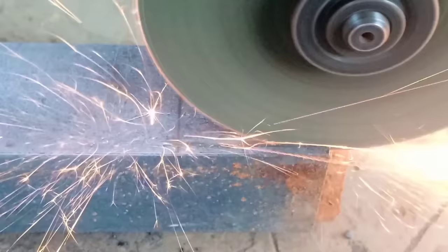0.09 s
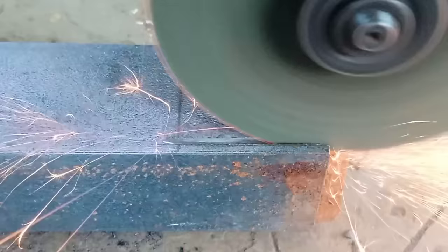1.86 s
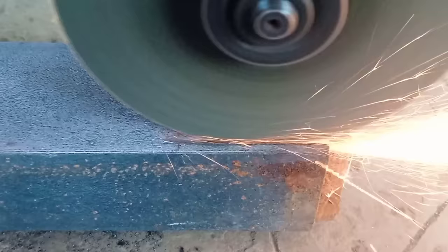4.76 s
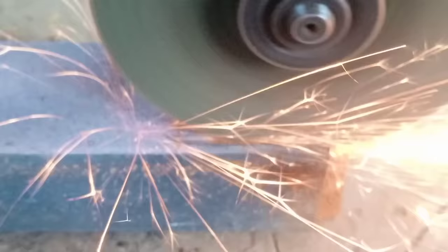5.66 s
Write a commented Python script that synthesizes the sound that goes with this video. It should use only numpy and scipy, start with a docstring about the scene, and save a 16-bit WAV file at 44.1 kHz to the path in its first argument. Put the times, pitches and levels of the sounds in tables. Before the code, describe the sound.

Very close, an angle grinder cuts a steel bar: harsh gritty rasp, fizzing bright hiss and wavering metallic whines. Air thrown by the disc thumps and flutters against the microphone. Before two seconds the disc lifts, speeds up and shows a smoother motor whirr, then bites again, drops in pitch and grinds on to the end. The sound is dry and centred, with no audible room.

```python
"""An angle grinder cuts a steel bar close to a mono microphone: grit noise and a rim pattern that repeats every turn.
Over it shaft orders whine as sines, and gusts thrown by the disc buffet the microphone as low noise and puffs.
At 1.8 s the disc lifts and speeds up: the rasp takes its free colour, motor hum and fan tones stand out.
Near 2.5 s it bites again, slows down, and cuts with fresh singing orders and gusts to the end."""
import sys
import numpy as np
from scipy import signal
from scipy.fft import rfft, irfft, next_fast_len
from scipy.io import wavfile
from scipy.ndimage import uniform_filter1d, map_coordinates

SR = 44100
rng = np.random.default_rng(int(sys.argv[2]) if len(sys.argv) > 2 else 0)


def waveform_to_disk(signal):
    """Save audio, clipped to [-1, 1], as 16-bit WAV at the path in sys.argv[1]."""
    frames = np.transpose(np.atleast_2d(signal))
    scaled = np.clip(frames, -1, 1) * 32767
    samples = np.round(scaled).astype(np.int16)
    wavfile.write(sys.argv[1], SR, samples)


def magnitude_from_level(level_db):
    """Linear magnitude for a level in decibels (20 dB per decade)."""
    exponent = np.asarray(level_db, float) / 20
    return 10 ** exponent


N = 280917

# disc speed: time_s, speed_turns_per_s
DISC_SPEED = [(0.0, 140.5), (0.2, 140), (0.3, 139.3), (0.5, 138.4), (0.62, 137.4), (0.8, 137.3),
              (0.95, 135.7), (1.1, 137.2), (1.25, 137.8), (1.4, 139.6), (1.6, 139.7), (1.78, 140.6),
              (1.84, 145.0), (2.0, 153.8), (2.2, 159.5), (2.4, 161.8), (2.52, 162.3), (2.61, 161.8),
              (2.7, 159.1), (2.9, 152.2), (3.0, 146.1), (3.1, 142.4), (3.3, 137.0), (3.45, 135.7),
              (3.75, 134.0), (4.1, 134.6), (4.42, 135.9), (4.7, 134.2), (5.0, 133.55), (5.4, 133.2),
              (5.65, 132.5), (5.88, 133.85), (6.1, 133.5), (6.37, 132.1)]
# firmness of the rim in the cut: time_s, contact_0_to_1
RIM_CONTACT = [(0, 0.77), (1.78, 0.84), (1.86, 0.33), (2.47, 0.08), (2.53, 0.57), (2.95, 0.77), (3.1, 0.86),
               (6.37, 0.82)]
# rasp level before fluctuations: time_s, level_db
RASP_LEVEL = [(0, -33.5), (0.8, -33.5), (1.0, -35.5), (1.5, -33.5), (1.79, -35), (1.84, -37.5), (1.88, -32),
              (1.92, -37), (1.95, -34), (2.15, -29.5), (2.36, -30), (2.39, -35.5), (2.45, -34),
              (2.49, -31.5), (2.65, -35), (3.7, -34.5), (4.36, -34.5), (5.75, -34.5), (6.37, -34)]
# rasp spectrum in the cut, relative: freq_hz, density_db_per_hz
CUT_SPECTRUM = [(210, -30), (350, -6.5), (600, -8.5), (1300, -5.5), (1800, -8), (2800, -8), (3850, -1),
                (4750, -13), (6200, -6), (8000, -10), (10500, -19), (12000, -20), (13800, -20), (14600, -4),
                (15800, -2.5)]
# rasp spectrum running free, relative: freq_hz, density_db_per_hz
FREE_SPECTRUM = [(410, -52), (700, -15.5), (1040, -12), (1170, -6), (1730, -16), (1920, -10), (2660, -13),
                 (3200, 2), (4300, -8), (7300, -9), (8000, -16), (10400, -46), (17600, -120)]
# resonances and notches of bar, guard and disc: center_hz, width_hz, gain_db
RESONANCES = [(1394, 270, 6.5), (2203, 950, 11), (2550, 320, 7), (3100, 530, 5), (5176, 220, 10.5),
              (5550, 210, 8), (6620, 450, 4.5), (7017, 390, 13.5), (7670, 430, 11.5), (8530, 170, 8),
              (9700, 430, 4), (12700, 500, 5), (14900, 520, 5), (2890, 160, -6.5), (3840, 165, -24),
              (6040, 200, -2)]
# shaft orders that sing out, before flutter: start_s, order_per_turn, length_s, peak_db
SINGING_ORDERS = [(-0.05, 17, 0.85, -34), (-0.05, 37, 0.99, -35.5), (1.04, 37, 0.7, -42),
                  (-0.05, 50, 0.26, -35), (0.01, 23, 0.39, -33.5), (0.023, 18, 0.3, -34),
                  (0, 14, 0.42, -42), (-0.05, 16, 0.87, -31.5), (0.616, 19, 0.12, -32.5),
                  (0.502, 24, 1, -39.5), (0.867, 48, 0.16, -30), (0.94, 52, 0.13, -30),
                  (1.01, 16, 0.2, -34.5), (1.1, 10, 0.3, -47), (1.108, 50, 0.22, -30.5),
                  (1.327, 50, 0.3, -25), (1.32, 52, 0.22, -30), (1.334, 19, 0.23, -35.5),
                  (1.33, 49, 0.21, -28.5), (1.48, 51, 0.19, -33), (1.688, 17, 0.12, -30.5),
                  (1.734, 50, 0.08, -29), (2.51, 15, 0.071, -29.5), (2.52, 16, 0.2, -39),
                  (2.642, 15, 0.14, -31.5), (2.802, 15, 0.1, -33), (2.8, 17, 0.23, -34.5),
                  (2.95, 19, 0.7, -43), (2.818, 36, 0.2, -35), (2.83, 37, 0.73, -35.5),
                  (2.93, 48, 0.27, -30.5), (3.03, 16, 1, -39.5), (3.072, 49, 0.12, -35),
                  (3.07, 50, 0.49, -37), (3.08, 18, 0.21, -33), (3.09, 46, 0.18, -33),
                  (3.346, 17, 0.28, -35), (3.34, 52, 0.6, -39.5), (3.467, 39, 0.24, -40),
                  (3.693, 18, 0.12, -32), (3.72, 53, 0.53, -37), (3.73, 49, 0.45, -36),
                  (3.72, 44, 0.22, -41), (4.05, 44, 0.29, -36), (3.7, 54, 0.5, -36), (3.816, 24, 0.93, -38),
                  (4.0, 8, 0.42, -43), (4.02, 52, 0.12, -27.5), (4.14, 48, 0.19, -35),
                  (4.21, 16, 0.64, -32.5), (4.1, 37, 0.44, -39), (4.386, 52, 0.24, -29.5),
                  (4.458, 53, 0.39, -30.5), (4.36, 19, 0.27, -37), (4.722, 18, 0.78, -37.5),
                  (4.744, 19, 0.2, -33), (4.82, 17, 0.26, -38.5), (4.8, 52, 0.2, -35),
                  (4.98, 39, 0.39, -37), (5.01, 24, 0.18, -34.5), (5.183, 16, 0.33, -35.5),
                  (5.19, 52, 0.59, -35.5), (5.15, 19, 0.22, -41), (5.47, 20, 0.17, -37),
                  (5.5, 19, 0.68, -41.5), (5.6, 16, 0.49, -38.5), (5.51, 49, 0.46, -40),
                  (5.56, 15, 0.17, -36), (5.59, 53, 0.15, -26.5), (5.595, 12, 0.62, -47),
                  (5.6, 51, 0.57, -40), (5.75, 8, 0.67, -49), (5.85, 7, 0.52, -48), (5.85, 52, 0.43, -38)]
# orders that come and go faintly in the cut: order_per_turn, usual_peak_db
FAINT_ORDERS = [(8, -55), (10, -53), (16, -45.5), (17, -45), (18, -45.5), (19, -48), (20, -47.5), (23, -45),
                (37, -48), (49, -43.5), (50, -42), (51, -41), (52, -41), (53, -41), (54, -43), (55, -44),
                (57, -42), (58, -45.5)]
# gusts on the microphone: start_s, length_s, buffet_db, puff_db
GUSTS = [(0.207, 0.27, -37.5, -47), (0.496, 0.13, -35.5, -41.5), (0.775, 0.11, -33, -34),
         (0.893, 0.057, -30.5, -30), (0.965, 0.14, -32, -38.5), (1.12, 0.11, -32, -37),
         (1.342, 0.039, -36, -41), (1.397, 0.14, -37, -36.5), (1.523, 0.15, -34, -34.5),
         (1.679, 0.12, -34, -38), (1.956, 0.22, -35.5, -50), (2.177, 0.26, -30.5, -49),
         (2.468, 0.094, -31.5, -50), (2.565, 0.11, -30, -32.5), (2.702, 0.22, -36, -38),
         (2.932, 0.14, -37, -31.5), (3.093, 0.16, -37.5, -37), (3.372, 0.081, -31.5, -38),
         (3.693, 0.17, -30.5, -38), (3.87, 0.073, -35.5, -41.5), (3.97, 0.273, -37, -41.5),
         (4.285, 0.091, -42, -45), (4.439, 0.2, -32, -47), (4.681, 0.12, -38, -40.5),
         (4.851, 0.048, -31, -42), (4.927, 0.08, -36, -42), (5.049, 0.03, -29.5, -34.5),
         (5.175, 0.15, -36, -36), (5.395, 0.04, -38, -38.5), (5.452, 0.16, -34, -37),
         (5.595, 0.13, -35.5, -36.5), (5.753, 0.25, -42.5, -48.5)]
# low turbulence, relative: freq_hz, density_db_per_hz
BUFFET_SPECTRUM = [(15, -54), (25, -15.5), (97, 4.5), (177, 1.5), (213, -2), (274, -1), (365, -9.5),
                   (500, -9), (650, -47), (1100, -120)]
# small eddies, relative: freq_hz, density_db_per_hz
EDDY_SPECTRUM = [(60, -6), (200, -2.5), (450, 1), (900, -5), (1600, -8), (3000, -15), (6000, -56)]
# strongest puffs, below zero = suction: time_s, nominal_peak_full_scale
STRONG_PUFFS = [(0.8607, 0.17), (0.8692, -0.16), (0.908, -0.16), (0.925, 0.23), (0.9337, -0.13),
                (0.9956, 0.24), (1.038, -0.14), (1.156, -0.2), (1.2207, 0.17), (1.226, -0.2),
                (1.4348, -0.22), (1.4784, -0.17), (1.5358, 0.24), (1.5635, -0.14), (1.587, -0.14),
                (1.6156, 0.24), (1.6213, 0.29), (1.6357, -0.2), (1.643, -0.14), (2.4132, -0.16),
                (2.572, -0.16), (2.592, 0.24), (2.6123, -0.16), (2.6297, -0.21), (2.6456, -0.17),
                (2.656, 0.13), (2.7862, 0.21), (2.9491, 0.14), (2.9684, -0.29), (2.9885, -0.22),
                (2.993, -0.24), (3.1418, 0.29), (3.1847, -0.18), (3.1914, -0.16), (3.2427, -0.18),
                (3.7577, -0.19), (4.0629, 0.21), (4.212, -0.18), (4.3071, -0.18), (4.404, -0.14),
                (4.463, 0.14), (4.5518, -0.15), (4.932, -0.15), (5.283, 0.23), (5.2985, -0.23),
                (5.448, -0.18), (5.493, 0.26), (5.6459, 0.1), (5.6537, -0.16), (5.6624, -0.18)]

BAND_LIMIT_HZ = 15740
LOADED_TURNS_PER_S = 132.5


def unit(x):
    """Bring to rms 1."""
    return x / np.sqrt(np.mean(x ** 2) + 1e-20)


def along(points, hz):
    """Interpolate (freq_hz, value) points on a log frequency axis."""
    point_hz, value = np.transpose(points)
    return np.interp(np.log(hz + 1), np.log(point_hz + 1), value)


def curves(rows):
    """One value per sample for each column after the time."""
    time_s, *columns = np.transpose(rows)
    return [np.interp(np.arange(N) / SR, time_s, column) for column in columns]


def wobble(rate_hz):
    """A smooth random curve, rate_hz knots a second."""
    step = 32
    coarse = np.arange(0, N + step, step)
    knots = rng.standard_normal(int(N * rate_hz / SR) + 5)
    smooth = map_coordinates(knots, [coarse * rate_hz / SR])
    return np.interp(np.arange(N), coarse, smooth)


def filtered(x, response):
    """x times a response of frequency."""
    size = next_fast_len(N + 8192)
    hz = np.fft.rfftfreq(size, 1 / SR)
    return irfft(rfft(x, size) * response(hz), size)[..., :N]


def rasp(turns, contact):
    """Rim pattern plus grit noise, both pulsing with the turn, coloured by steel and disc."""
    disc_cut_db, disc_free_db = 1, -1  # disc ring over bar ring
    hiss_level_db, hiss_free_db, hiss_flicker_db = -32, -1.5, 0.57  # spark hiss
    hiss_follow = 0.35  # share of the rasp's swings

    bar_db = curves(RASP_LEVEL)[0] + 0.19 * wobble(4.71)
    chatter_db = 0.8 * wobble(34)  # shared by the whole rasp
    disc_db = bar_db + disc_cut_db * contact + disc_free_db * (1 - contact) + 0.37 * wobble(14)
    hiss_db = hiss_level_db + hiss_free_db * (1 - contact)
    hiss_db = hiss_db + hiss_follow * (bar_db - bar_db.mean()) + hiss_flicker_db * wobble(10)

    rim = round_disc(turns, memory_turns=19.3, points_per_turn=320)
    runout_db = 1.25 * contact * round_disc(turns, memory_turns=1.7, points_per_turn=4)
    runout_db += 0.57 * contact * np.cos(2 * np.pi * turns) + 0.21 * wobble(23)
    rim_share = np.clip(0.5 * contact, 0, 1)
    grit = rng.standard_normal(N)
    rough = np.sqrt(rim_share) * rim + np.sqrt(1 - rim_share) * grit
    bite = patchy(magnitude_from_level(runout_db) * rough, depth_db=1.37)

    def above(hz, edge_hz):
        return 1 / (1 + (edge_hz / (hz + 1)) ** 16)

    def zones(hz):  # bar, disc, hiss
        low, high = above(hz, 4200), above(hz, 8200)
        return np.array([1 - low, low - high, high * (hz < BAND_LIMIT_HZ)])

    def cut_response(hz):
        ring_db = sum(db / (1 + (2 * (hz - center) / width) ** 2) for center, width, db in RESONANCES)
        return magnitude_from_level(along(CUT_SPECTRUM, hz)) * magnitude_from_level(ring_db) * zones(hz)

    def free_response(hz):
        return magnitude_from_level(along(FREE_SPECTRUM, hz)) * zones(hz)[:2]

    cut = [unit(part) for part in filtered(bite, cut_response)]
    free = [unit(part) for part in filtered(bite, free_response)]
    bar, disc = np.sqrt(contact) * cut[:2] + np.sqrt(1 - contact) * free
    return magnitude_from_level(chatter_db) * (magnitude_from_level(bar_db) * bar + magnitude_from_level(disc_db) * disc + magnitude_from_level(hiss_db) * cut[2])


def round_disc(turns, memory_turns, points_per_turn):
    """A random pattern around the rim that returns each turn and wears into a new one over some turns."""
    rows = rng.standard_normal((int(turns[-1]) + 2, points_per_turn))
    worn = signal.lfilter([1], [1, -np.exp(-1 / memory_turns)], rows, axis=0)
    return unit(map_coordinates(worn.ravel(), [turns * points_per_turn]))


def patchy(x, depth_db):
    """The colour shifts in random patches as the contact point wanders."""
    spectrum = signal.stft(x, nperseg=512)[2]
    field = uniform_filter1d(rng.standard_normal(spectrum.shape), size=5, axis=0)
    field = uniform_filter1d(field, size=12, axis=1)
    return signal.istft(spectrum * magnitude_from_level(depth_db * unit(field)), nperseg=512)[1][:N]


def whine(turns, speed, contact):
    """Each singing order swells, flutters and fades; neighbours stay nearly in step, so they beat once a turn."""
    swell_s, faint_swing_db = 0.074, 4
    faint_loss_db_per_hz = 0.5  # faint orders leave the resonances as the disc speeds up
    t = np.arange(N) / SR
    out = np.zeros(N)
    faint = {round(order): db for order, db in FAINT_ORDERS}
    drift_rad = 0.021 * wobble(6)  # the high spot of the rim creeps a little
    for order in sorted({round(row[1]) for row in SINGING_ORDERS} | set(faint)):
        faint_db = faint.get(order, -120) - faint_loss_db_per_hz * (speed - LOADED_TURNS_PER_S)
        swell = contact ** 2 * magnitude_from_level(faint_db + faint_swing_db * wobble(2.96))
        for start_s, row_order, length_s, peak_db in SINGING_ORDERS:
            if round(row_order) != order:
                continue
            edge_s = np.minimum(t - start_s, start_s + length_s - t)
            shape = np.clip(edge_s / swell_s + 0.5, 0, 1)
            swell = np.maximum(swell, magnitude_from_level(peak_db) * shape)
        phase = order * (2 * np.pi * turns + drift_rad) + 0.49 * wobble(20) + 0.5 * wobble(2.007)
        out += swell * magnitude_from_level(1.9 * wobble(16)) * np.sin(phase)
    return out


def motor(turns, speed, contact):
    """The rotor turns 37 to 10 over the disc; its hum and the 19 fan blades stand out when the load comes off."""
    hum_loaded_db, hum_free_db = -56, 15  # rms level, gain out of the cut
    fan_loaded_db, fan_free_db, fan_db_per_hz = -59, 9.5, 0.4  # last: gain over the loaded disc speed
    rotor = 2 * np.pi * turns * 37 / 10
    hum_db = hum_loaded_db + hum_free_db * (1 - contact)
    fan_db = fan_loaded_db + fan_free_db * (1 - contact)
    fan_db = fan_db + fan_db_per_hz * np.maximum(speed - LOADED_TURNS_PER_S, 0)
    hum = magnitude_from_level(hum_db + 1.3 * wobble(9)) * np.sin(rotor + 0.39 * wobble(30))
    fan = magnitude_from_level(fan_db + 2.8 * wobble(24.95)) * np.sin(19 * rotor + 0.55 * wobble(40))
    return np.sqrt(2) * (hum + fan)


def draught(turns):
    """Lumpy low turbulence; near each turn of the disc a puff of random size pushes or sucks at the membrane."""
    buffet_db, puff_db = gusts()
    turbulence = filtered(rng.standard_normal(N), lambda hz: magnitude_from_level(along(BUFFET_SPECTRUM, hz)))
    buffet = unit(magnitude_from_level(2.7 * wobble(45)) * turbulence)

    passes = np.flatnonzero(np.diff(np.floor(turns)))
    jitter, size, sign = rng.standard_normal((3, len(passes)))
    kicks = np.zeros(N)
    place = np.clip(passes + (25 * jitter).astype(int), 0, N - 1)
    kicks[place] = np.sign(sign - 0.3) * magnitude_from_level(3.8 * size)
    kicks = np.clip(kicks * magnitude_from_level(puff_db + 12.5), -0.1, 0.1)
    for time_s, peak in STRONG_PUFFS:  # a strong puff clears the weak ones around it
        center = round(time_s * SR)
        kicks[center - 130:center + 130] = 0
        kicks[center - 9] = peak  # the push peaks about 8 samples later
    u = np.arange(600) / SR / 0.00018
    push = u * np.exp(1 - u) - 0.1 * (u / 9) * np.exp(1 - u / 9)  # quick push, slow rebound

    lumpy = magnitude_from_level(4.5 * wobble(90)) * rng.standard_normal(N)
    eddies = unit(filtered(lumpy, lambda hz: magnitude_from_level(along(EDDY_SPECTRUM, hz))))
    return magnitude_from_level(buffet_db) * buffet + magnitude_from_level(puff_db) * eddies + np.convolve(kicks, push)[:N]


def gusts():
    """Buffet and puff levels in dB: each gust rises out of the calm, holds and falls back."""
    calm_buffet_db, calm_puff_db, lump_db = -45, -50.5, 2
    rise_s, fall_s = 0.023, 0.059
    t = np.arange(N) / SR
    levels = np.outer(magnitude_from_level([calm_buffet_db, calm_puff_db]), np.ones(N))
    for start_s, length_s, *level_db in GUSTS:
        edge = np.minimum((t - start_s) / rise_s, (start_s + length_s - t) / fall_s)
        shape = np.clip(edge + 0.5, 0, 1)
        levels = np.maximum(levels, np.outer(magnitude_from_level(level_db), shape))
    return 20 * np.log10(levels) + lump_db * np.array([wobble(26), wobble(34)])


def scene():
    """All sources reach one microphone, carried on two equal channels."""
    speed, = curves(DISC_SPEED)
    contact = np.clip(curves(RIM_CONTACT)[0], 0, 1)
    turns = np.cumsum(speed) / SR
    mono = rasp(turns, contact) + whine(turns, speed, contact)
    mono = mono + motor(turns, speed, contact) + draught(turns)
    return np.array([mono, mono])


def roll_off(x):
    """The treble ends steeply here."""
    return signal.sosfilt(signal.butter(12, 17110, fs=SR, output="sos"), x)


def record(dry):
    """The microphone drops the deepest bass; nothing passes above the band limit."""
    mix = filtered(dry, lambda hz: (hz < BAND_LIMIT_HZ) / np.sqrt(1 + (55 / (hz + 1)) ** 6))
    return roll_off(mix)


dry = scene()
out = record(dry)
waveform_to_disk(out)
```